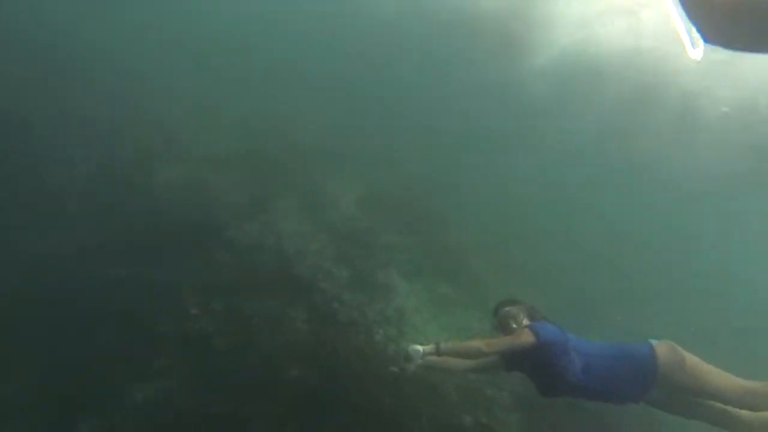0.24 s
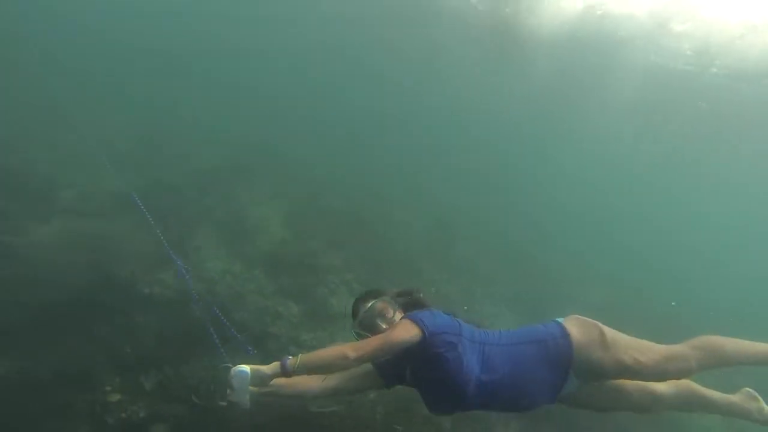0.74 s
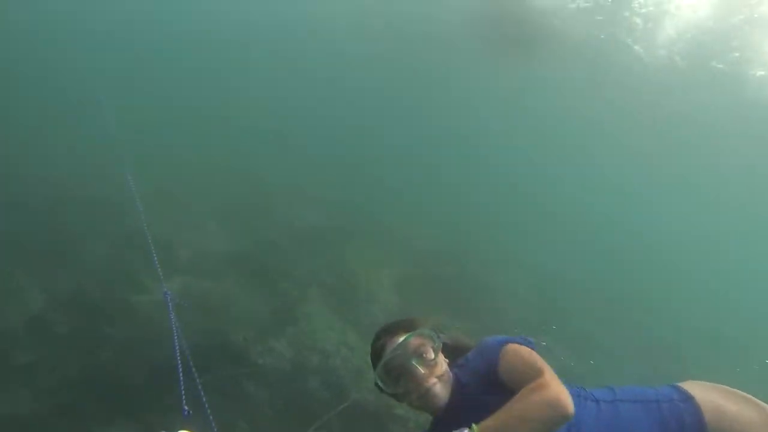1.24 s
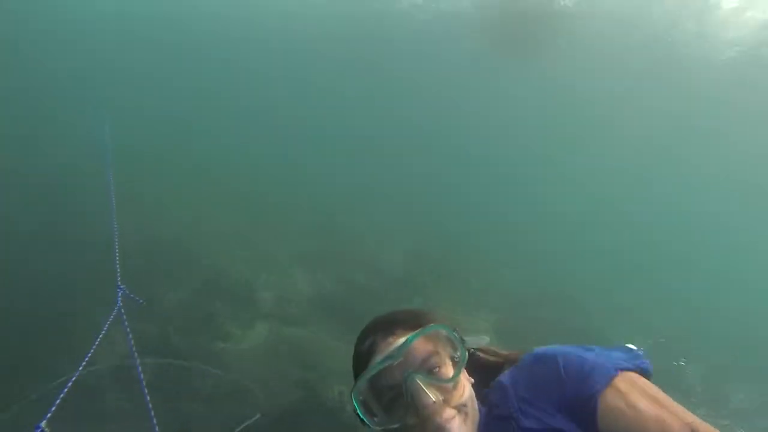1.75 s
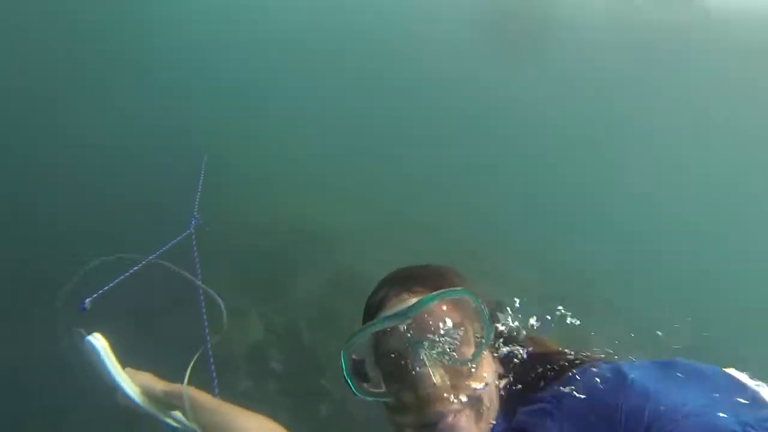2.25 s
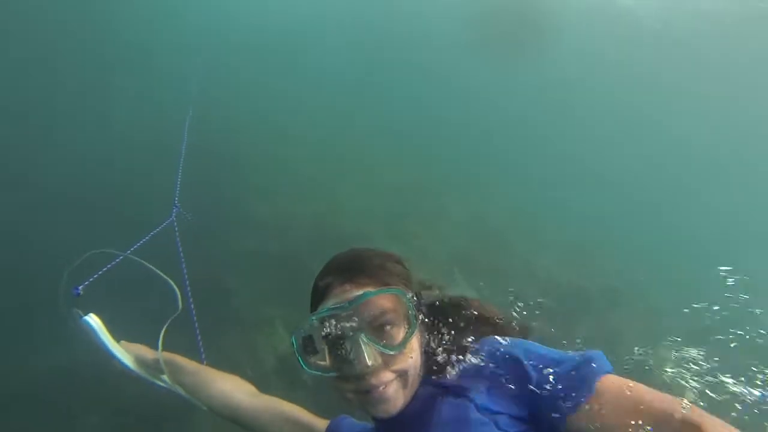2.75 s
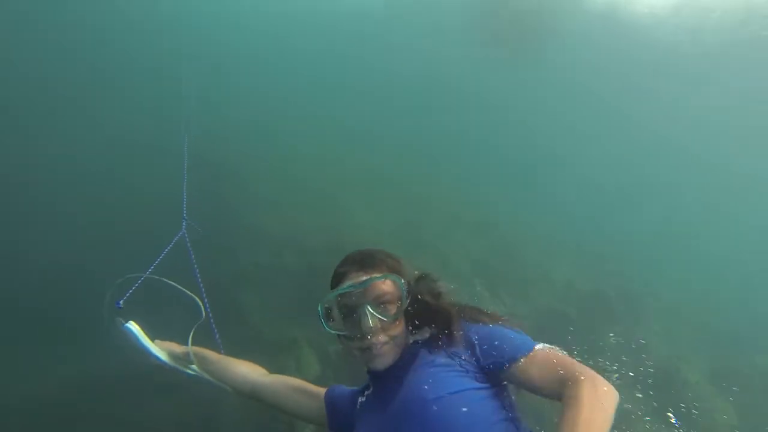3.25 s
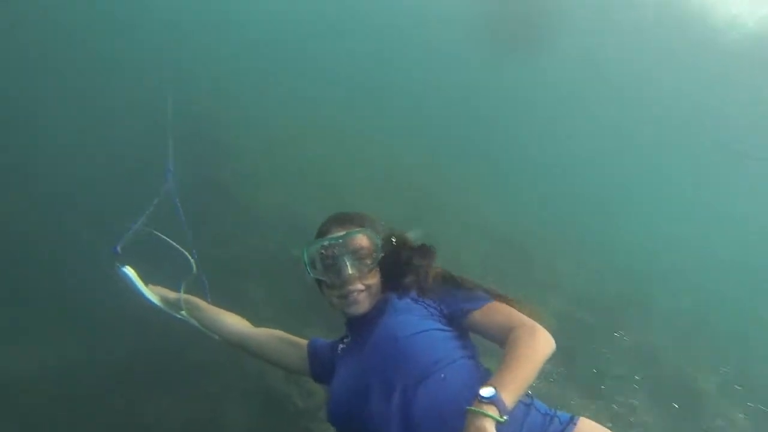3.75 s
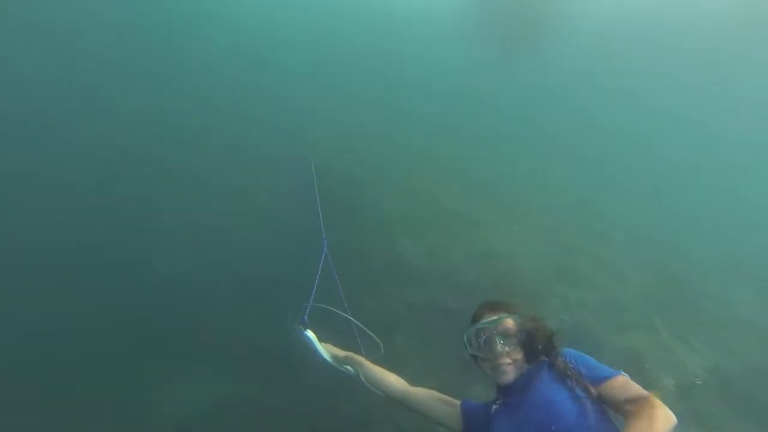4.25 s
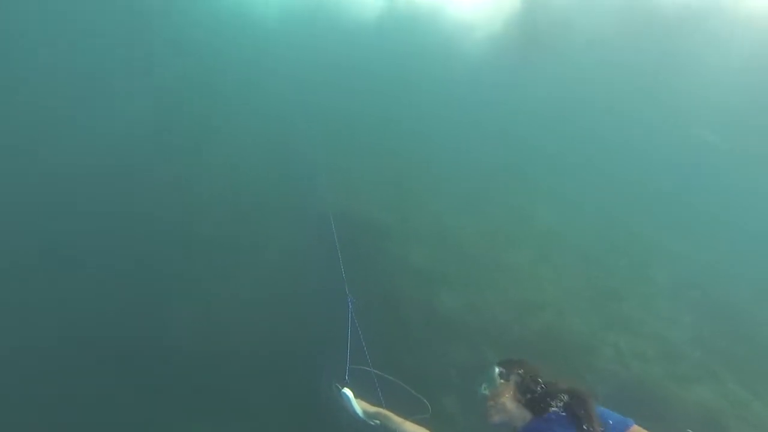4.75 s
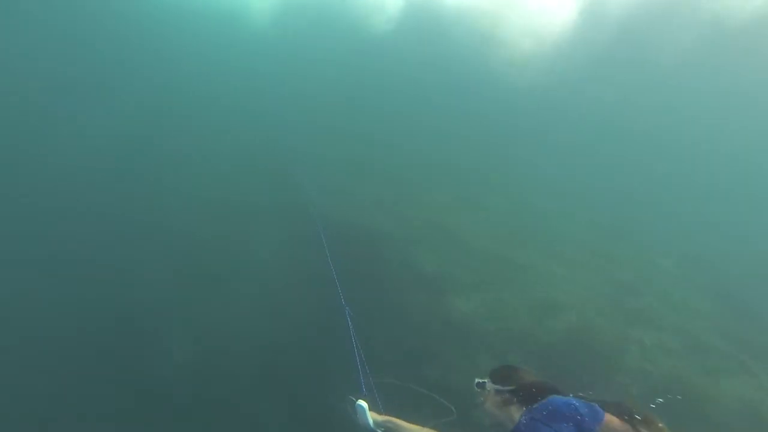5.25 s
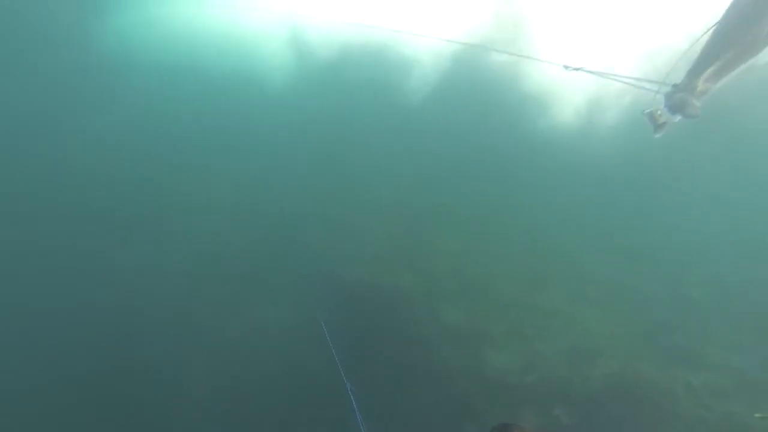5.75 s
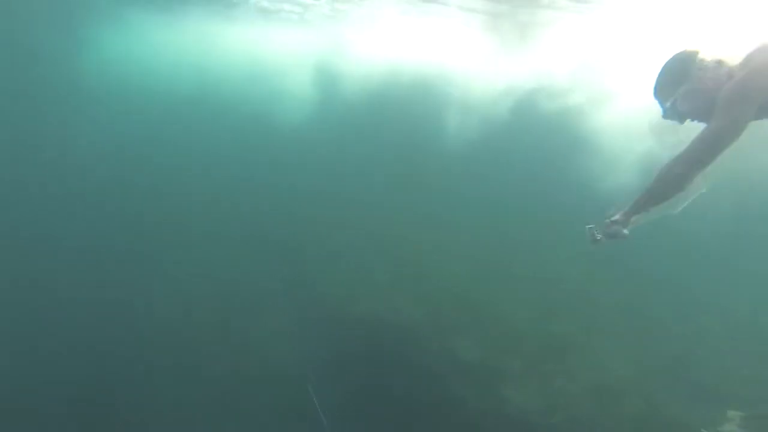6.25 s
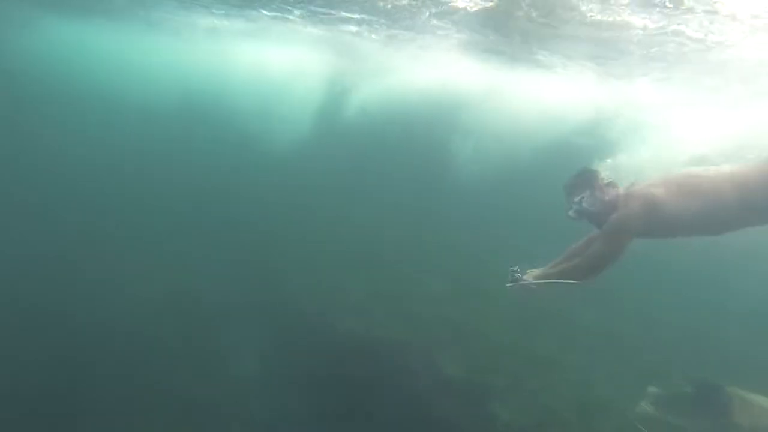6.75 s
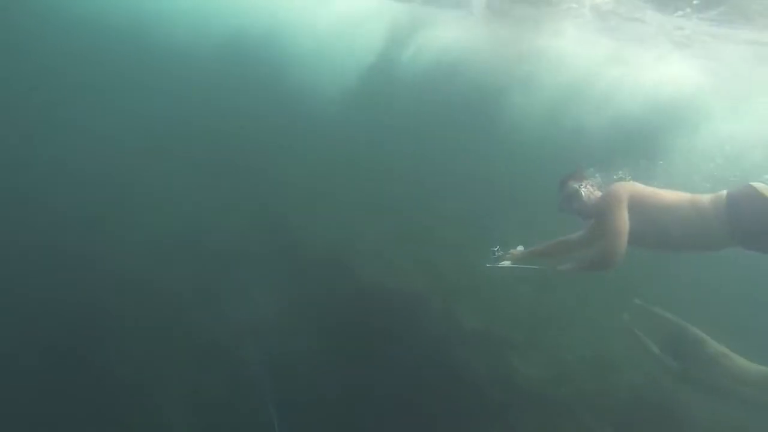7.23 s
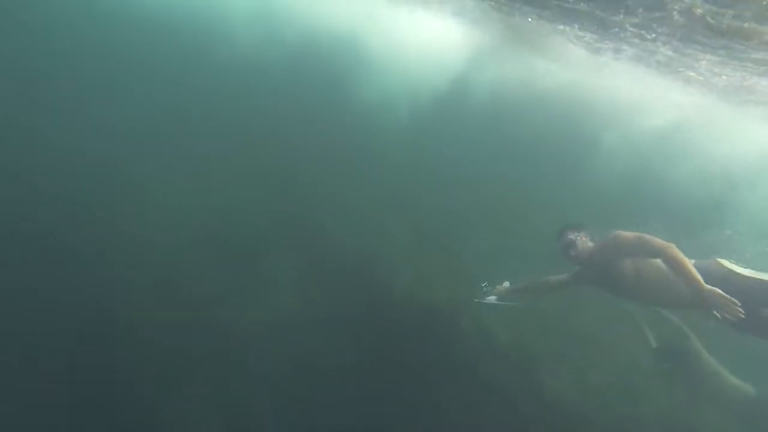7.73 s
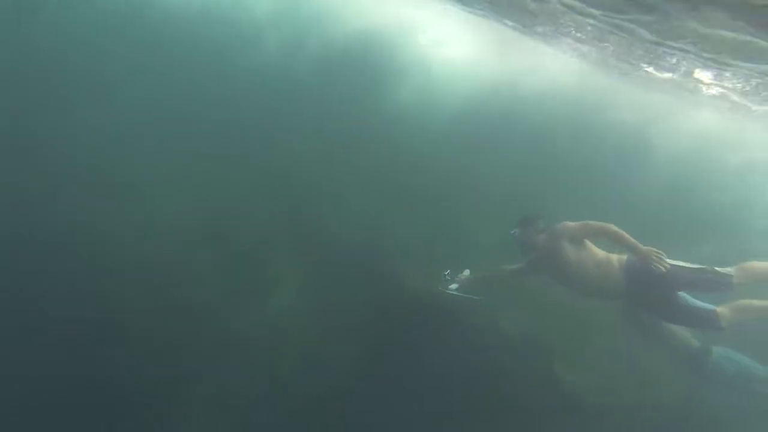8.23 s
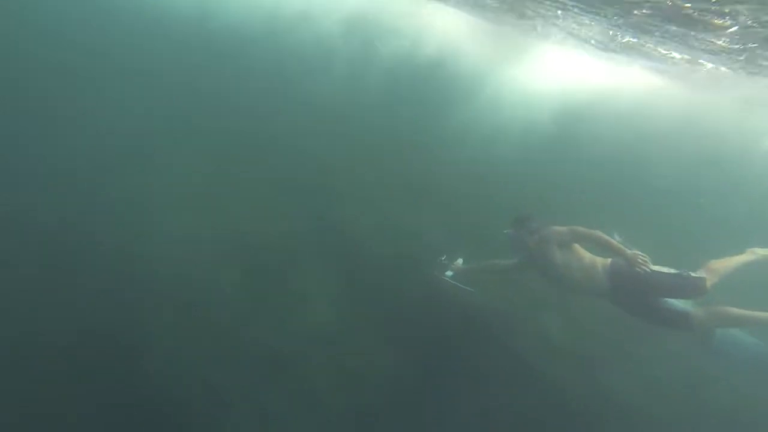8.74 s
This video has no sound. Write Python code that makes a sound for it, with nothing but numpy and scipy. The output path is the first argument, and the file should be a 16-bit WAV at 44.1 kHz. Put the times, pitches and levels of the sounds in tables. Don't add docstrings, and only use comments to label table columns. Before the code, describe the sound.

Close, muffled underwater sound from a microphone dragged through the sea. It opens with strong low rumble, eases before three seconds, then surges again, with heavy slaps near seven. A soft motor drone rises early, wobbles in pitch, and disappears about seven and a half seconds in. Fizzing wake, ringing bubbles, gurgles and sparse dry ticks continue over the rumble to the end.

```python
import sys
import numpy as np
from scipy import signal
from scipy.fft import rfft, irfft, next_fast_len
from scipy.io import wavfile
from scipy.ndimage import uniform_filter1d

SR = 44100
rng = np.random.default_rng(int(sys.argv[2]) if len(sys.argv) > 2 else 0)


def volts_from_db(level):
    exponent = np.asarray(level, float) / 20
    return 10 ** exponent


def dump_mix(stems):
    frames = np.atleast_2d(stems).T
    limited = np.clip(frames, -1, 1)
    pcm = np.round(limited * 32767).astype(np.int16)
    wavfile.write(sys.argv[1], SR, pcm)


N = 396459

# (time [s], level [dB])
FLOW = [(0.0, -17.5), (0.5, -19.5), (1.0, -18.5), (1.8, -21.5), (2.2, -23.5), (2.7, -26), (3.2, -24),
        (3.8, -20), (4.3, -20.5), (4.9, -22), (5.6, -22.5), (6.3, -22), (6.7, -19.5), (7.5, -17),
        (7.8, -22), (8.2, -22), (8.55, -21), (8.99, -24.5)]
# (frequency [Hz], density [dB per Hz])
DEEP_COLOUR = [(4, -37.5), (10, 7.5), (20, -2.5), (45, -1), (75, -7.5), (110, -18.5), (160, -39)]
# (frequency [Hz], density [dB per Hz])
UPPER_COLOUR = [(60, -17.5), (95, 0), (140, -5), (200, -13), (300, -22.5), (450, -30.5), (700, -58.5)]
# (time [s], peak [dB], pitch [Hz])
EDDIES = [(0.569, -13, 70), (1.061, -19, 24.74), (2.87, -10, 33.3), (3.19, -9, 36.1), (3.644, -13, 25.3),
          (3.9, -21, 84.1), (4.087, -11.5, 48.1), (5.192, -27.5, 55.6), (5.607, -15, 48),
          (5.965, -12.5, 39.9), (6.035, -11, 35), (6.331, -17.5, 30), (6.538, -13, 35), (7.031, -7.5, 32),
          (7.256, -20, 47.5), (7.479, -6.5, 32), (7.966, -15.5, 65.2), (8.48, -12, 35), (8.714, -22, 51.2)]
# (time [s], pitch [Hz], level [dB])
ENGINE = [(0.0, 115.1, -45), (0.19, 121.4, -30), (0.8, 125, -24), (1.1, 123.4, -26.5), (1.23, 119.7, -22.5),
          (1.95, 122.6, -23.5), (2.2, 116, -22.5), (2.61, 112.7, -29), (3.44, 118.8, -29),
          (3.8, 125.9, -23), (4.11, 125.6, -26.5), (5.09, 120.3, -28.5), (6.25, 121.8, -35.5),
          (6.67, 117.6, -34), (6.76, 108, -31), (7.1, 107, -27), (7.55, 113.2, -28)]
# (time [s], level [dB])
WAKE = [(0.0, -42.5), (0.9, -41.5), (1.4, -41), (1.75, -37.5), (2.0, -42.5), (2.3, -38.5), (2.75, -40),
        (3.3, -43), (3.9, -40), (4.5, -40), (4.8, -38), (5.8, -38.5), (6.25, -41), (6.9, -42), (7.1, -42),
        (7.45, -39), (7.7, -42.5), (8.99, -44)]
# (frequency [Hz], density [dB per Hz])
FIZZ_COLOUR = [(700, -33.5), (1000, -5), (1290, -5.5), (1490, -0.8), (1930, -4), (2220, -11.5),
               (2400, -12.5), (2820, -20), (3180, -16.5), (3500, -24.1), (4200, -81)]
# (frequency [Hz], density [dB per Hz])
GURGLE_COLOUR = [(300, -25.5), (450, -5.5), (600, -5), (800, -0.5), (1000, -3), (1200, -15), (1600, -20.5)]
# (frequency [Hz], density [dB per Hz])
HISS_COLOUR = [(2800, 6), (3600, 2.5), (4500, 2), (5200, -4), (5700, -5), (6600, -10), (8000, -9.5),
               (8900, -16), (9900, -9.5), (10600, -14.6), (12200, -17), (13500, -19.5), (14200, -25),
               (15000, -36), (16000, -52.5)]
# (start [s], end [s], centre [Hz], width [Hz], level [dB])
STREAMS = [(-0.43, 0.5, 1230, 230, -43), (4.5, 7, 1005, 84, -54.5), (7.5, 8.7, 873, 63, -55.5),
           (2.5, 4.2, 9940, 450, -79), (2.5, 3.2, 9890, 400, -76), (8.5, 9.9, 410, 280, -51),
           (6, 7.1, 790, 350, -51.5), (9.5, 9.9, 7300, 700, -78), (0, 4.96, 144.3, 31, -35.5),
           (4, 7.8, 111.8, 18, -35.5), (7.6, 8.3, 66.5, 19, -24), (4, 4.25, 75.2, 30, -27.5),
           (0, 2, 225, 120, -49), (7, 7.65, 220, 420, -43), (6.6, 7.05, 310, 360, -40),
           (6.7, 7.4, 480, 350, -51), (6.76, 7.06, 1560, 620, -38.5), (1.16, 1.48, 1440, 820, -38.5),
           (2, 2.379, 1380, 650, -39.5), (2.5, 2.75, 1580, 480, -40.5), (4.5, 4.7, 204, 190, -39)]
# (time [s], peak [dB], pitch [Hz])
BUBBLES = [(0.312, -33, 1300), (1.17, -23.5, 1610), (1.34, -17.5, 1814), (2.04, -22.5, 1475),
           (2.096, -19.5, 1750), (2.216, -20, 1340), (2.24, -15.5, 1437), (2.373, -22.5, 1257),
           (2.394, -14.5, 1783), (2.449, -13, 1417), (2.649, -21.5, 1680), (2.685, -20, 1890),
           (2.896, -28, 1600), (3.289, -17.5, 1640), (3.417, -26.5, 1530), (4.692, -21, 1470),
           (5.398, -21, 1310), (5.829, -21, 1580), (5.926, -22.5, 1650), (6.055, -22.5, 1430),
           (6.492, -23, 1010), (6.522, -15.5, 855), (6.673, -25, 955), (6.777, -22.5, 1380),
           (6.844, -18, 837), (6.901, -21, 1460), (7.022, -22, 940), (7.268, -23, 780), (8.559, -23.5, 835),
           (8.957, -27, 984),
           (0.067, -33.5, 4340), (0.411, -24, 1170), (0.732, -38, 2296), (1.298, -28, 1480),
            (2.177, -24, 1320), (7.345, -21, 1400), (7.958, -27.5, 1700), (1.8776, -31, 2340),
            (2.0412, -30, 2500), (2.0988, -28, 3046), (2.5117, -30, 2245), (4.6696, -34, 2540),
            (4.6934, -31, 2364), (4.7976, -31.5, 2504), (5.0953, -33.5, 2360), (5.3162, -32, 3185),
            (5.827, -39, 2380), (6.5137, -31, 2610), (6.563, -25.5, 2044), (6.778, -29, 2170),
            (6.858, -21.5, 1740), (6.9034, -29, 2290), (7.0206, -32, 2590), (7.2694, -25, 2290),
            (7.4116, -36, 2560),
           (0.212, -22.5, 1148), (1.084, -32, 640), (1.317, -22.5, 1780), (1.379, -21, 1515),
          (1.673, -28.5, 980), (1.741, -27, 1412), (2.135, -27, 1550), (2.208, -22, 1450),
          (2.559, -28.5, 1475), (2.632, -27, 1596), (2.662, -20, 1738), (2.738, -26.5, 1880),
          (2.791, -25.5, 1710), (3.068, -28, 1487), (4.628, -27.5, 1560), (4.652, -27.5, 1480),
          (5.096, -26, 1830), (5.248, -24, 1670), (5.59, -26, 1788), (5.802, -27, 1487),
          (6.145, -28.5, 1807), (6.25, -29.5, 1056), (6.707, -27, 1610), (7.152, -26.5, 1384),
          (7.378, -25.5, 1466), (7.737, -28.5, 1913), (7.778, -28.5, 853), (7.988, -29.5, 1142),
          (8.098, -29, 907), (8.259, -33, 1545), (8.609, -27, 1383), (8.893, -29, 1812)]
# (time [s], peak [dB], pitch [Hz], t60 [s])
KNOCKS = [(2.393, -24.5, 263, 0.11), (3.28, -36, 279, 0.066), (3.801, -14.5, 129.8, 0.17),
          (4.59, -18, 177.5, .1), (4.63, -20, 188, 0.09), (6.72, -26, 192, 0.075),
          (7.198, -21.5, 171, 0.13), (6.978, -26, 773, 0.046), (6.524, -30, 622, 0.083),
          (7.545, -15.5, 438, 0.025), (8.528, -16.5, 221, 0.04)]
# (time [s], body [dB], middle [dB], edge [dB])
SNAPS = [(0.0662, -41, -66.0, -72.0), (0.1456, -43.0, -52, -64.0), (0.161, -45, -53.0, -62.0),
         (0.173, -39, -51.0, -49.0), (0.2932, -33, -41, -47.0), (0.5541, -51.0, -58.0, -62.0),
         (0.5657, -40, -51, -66.0), (0.5945, -39.0, -51.0, -54.0), (0.6165, -35, -62.0, -63.0),
         (0.6368, -40.0, -53.0, -64.0), (0.655, -53.0, -66.0, -69.0), (0.7317, -32, -49, -61.0),
         (1.1976, -50.0, -65.0, -65.0), (1.272, -45, -52.0, -65.0), (1.3186, -50.0, -63.0, -57.0),
         (1.351, -38, -39, -43.0), (1.5963, -48.0, -51, -68), (1.7669, -41.0, -52, -69),
         (1.7937, -36, -46, -58), (1.8121, -43, -55.0, -56.0), (1.878, -37.5, -64.0, -67.0),
         (2.063, -47.0, -55, -71.0), (2.0887, -39, -50.0, -62.0), (2.2358, -50.0, -60.0, -73.0),
         (2.4418, -47, -64.0, -66.0), (3.0782, -47.0, -60.0, -63.0), (3.278, -45.0, -53.0, -67.0),
         (3.3293, -43.0, -57.5, -66.0), (3.4138, -42, -47.0, -49.0), (3.462, -43.0, -52.0, -51.0),
         (3.4925, -43.0, -52.0, -56.0), (3.6012, -44.0, -52.0, -50.0), (3.69, -48.0, -53, -62.0),
         (3.8442, -46.0, -55.0, -62.0), (4.5321, -37, -52.0, -48), (4.597, -46.0, -54, -61.0),
         (4.6982, -40.0, -43, -46), (4.7426, -39, -53.0, -62.0), (4.8773, -39, -52.0, -49.0),
         (4.9357, -49.0, -52.0, -57.0), (5.0314, -45.0, -68.0, -65.0), (5.2525, -42.0, -58.0, -64.0),
         (5.3148, -36, -52.0, -51.0), (5.3453, -45.0, -55.0, -64.0),
         (5.489, -56.0, -51, -57.0), (5.6291, -40, -44, -58.0), (5.685, -47, -47, -52.0),
              (5.7808, -42, -61.0, -64.0), (5.8651, -50.0, -50.0, -55.0), (5.9933, -39, -46, -46),
              (6.3325, -41.0, -57.0, -68.0), (6.3834, -47.0, -48, -50.0), (6.4437, -45.0, -56.0, -71.0),
              (6.4867, -48.0, -51, -71.0), (6.6508, -37, -46, -58.0), (6.9441, -43, -62.0, -65.0),
              (6.991, -56.0, -48, -61.0), (7.1821, -40, -56.0, -66.0), (7.3123, -44, -47, -57.0),
              (7.3567, -50.0, -56.0, -55.0), (7.4151, -44, -50.0, -57.0), (7.5183, -45, -49, -69.0),
              (7.6151, -44.0, -50.0, -59.0), (7.7248, -49.0, -47.0, -53.0), (8.0701, -43, -46, -53.0),
              (8.4118, -58.0, -45.0, -65.0), (8.4327, -46.0, -55.0, -52.0), (8.5334, -48.0, -53.0, -65.0),
              (8.5764, -44.0, -61.0, -67.0), (8.5959, -49.0, -43.0, -39), (8.6807, -37, -43, -54),
              (8.7685, -43.0, -64.0, -63.0), (8.807, -48.0, -52.0, -67.0), (8.883, -56.0, -55, -68.0),
              (8.9047, -44, -55, -66.0), (8.928, -58.0, -56.0, -69.0), (8.962, -59.0, -56.0, -53)]
# (frequency [Hz], level [dB])
WHINE = [(9890, -95), (11149, -92), (11209, -99)]

MEAN_FLOW_DB, MEAN_WAKE_DB = -20, -41


def evened(x):
    return x / np.sqrt(np.mean(x ** 2) + 1e-20)


def curves(rows):
    s, *columns = np.transpose(rows)
    return [np.interp(np.arange(N) / SR, s, c) for c in columns]


def coloured(x, points):
    f, db = np.transpose(points)
    size = next_fast_len(N)
    hz = np.fft.rfftfreq(size, 1 / SR)
    gain = volts_from_db(np.interp(np.log(hz + 1), np.log(f), db, -120, -120))
    return evened(irfft(rfft(x, size) * gain, size)[:N])


def drift(hz):
    coarse = rfft(rng.standard_normal(2048))
    coarse /= 1 + (np.arange(len(coarse)) * SR / N / hz) ** 2
    return np.interp(np.linspace(0, 2047, N), np.arange(2048), evened(irfft(coarse)))


def add(mix, s, sound):
    part = mix[round(s * SR):][:len(sound)]
    part += sound[:len(part)]


def ping(hz, t60, glide, rise_s):
    t = np.arange(round(t60 * SR) + 8) / SR
    tone = np.sin(2 * np.pi * hz * t * (1 + glide * t / t60))
    return tone * volts_from_db(-60 * t / t60) * (1 - np.exp(-t / rise_s))


def flow():
    flow_db, = curves(FLOW)
    deep = coloured(rng.standard_normal(N), DEEP_COLOUR)
    lumpy_noise = rng.standard_normal(N) * volts_from_db(2.36 * drift(50))
    upper = coloured(lumpy_noise, UPPER_COLOUR)
    deep_db = flow_db + 1.36 + 2 * drift(8.4)
    upper_db = -31 + 1.21 * (flow_db - MEAN_FLOW_DB)
    push = volts_from_db(deep_db) * deep + volts_from_db(upper_db) * upper
    return 0.5 * np.tanh(push / 0.5)


def eddies():
    out = np.zeros(N)
    for s, db, hz in EDDIES:
        add(out, s, volts_from_db(db + 5) * ping(hz, t60=4 / hz, glide=-0.05, rise_s=0.37 / hz))
    return out


def engine():
    hz, db = curves(ENGINE)
    phase = 2 * np.pi * np.cumsum(hz * (1 + 0.014 * drift(8))) / SR
    fade = np.clip((ENGINE[-1][0] - np.arange(N) / SR) / 0.21, 0, 1)
    level = np.sqrt(2) * fade * volts_from_db(db - 1 + 1.65 * drift(10.7))
    return level * (np.sin(phase) + volts_from_db(-25) * np.sin(2 * phase))


def swarm(lo_hz, hi_hz, per_s, cycles, spread_db, clump_db):
    kinds = 20
    hits = volts_from_db(spread_db * np.minimum(rng.exponential(1, N), 4)) * rng.choice([-1, 1], N)
    hits *= rng.random(N) < per_s / SR * volts_from_db(clump_db * drift(12))
    kind, out = rng.integers(0, kinds, N), np.zeros(N)
    for k, hz in enumerate(np.geomspace(lo_hz, hi_hz, kinds)):
        decay = np.exp(-np.log(1000) * hz / cycles / SR)
        turn = 2 * np.pi * hz / SR
        resonance = [1, -2 * decay * np.cos(turn), decay ** 2]
        out += signal.lfilter([np.sin(turn) * hz], resonance, hits * (kind == k))
    return evened(out)


def patchy(x, depth_db):
    z = signal.stft(x, nperseg=512)[2]
    across_hz = uniform_filter1d(rng.standard_normal(z.shape), 5, 0)
    patches = evened(uniform_filter1d(across_hz, 20, 1))
    return signal.istft(z * volts_from_db(depth_db * patches), nperseg=512)[1][:N]


def wake():
    fizz_db, = curves(WAKE)
    flow_db, = curves(FLOW)
    nearness_db = fizz_db - MEAN_WAKE_DB
    gurgle_db = -48.5 + 0.83 * nearness_db + 0.49 * (flow_db - MEAN_FLOW_DB)
    hiss_db = -58.5 + 0.48 * nearness_db
    foam = rng.standard_normal((3, N))
    small = swarm(900, 4220, per_s=2000, cycles=30, spread_db=2.6, clump_db=1.7)
    fizz = coloured(0.94 * foam[0] + 0.59 * small, FIZZ_COLOUR)
    large = swarm(400, 1290, per_s=400, cycles=22, spread_db=3.3, clump_db=2.3)
    low_foam = coloured(foam[1], [(200, 0.0047), (2000, 0)])
    gurgle = coloured(0.87 * low_foam + 0.39 * large, GURGLE_COLOUR)
    crackle = swarm(3500, 15000, per_s=1000, cycles=20, spread_db=4.5, clump_db=2.5)
    hiss = coloured(1.03 * foam[2] + 0.6 * crackle, HISS_COLOUR)
    mix = volts_from_db(fizz_db + 0.3) * fizz + volts_from_db(gurgle_db) * gurgle + volts_from_db(hiss_db) * hiss
    return patchy(mix * volts_from_db(1.1 * drift(30)), depth_db=0.49)


def streams():
    out = np.zeros(N)
    for start, end, hz, width_hz, db in STREAMS:
        noise = rng.standard_normal(round((end - start) * SR))
        grains = noise * volts_from_db(2.5 * drift(60)[:len(noise)])
        edges_hz = [hz - width_hz / 2, hz + width_hz / 2]
        band = signal.butter(2, edges_hz, "band", fs=SR, output="sos")
        swell = signal.windows.tukey(len(noise), 0.6)
        add(out, max(start, 0), volts_from_db(db) * evened(signal.sosfilt(band, grains)) * swell)
    return out * volts_from_db(1.4 * drift(28))


def pops():
    out, near = np.zeros(N), BUBBLES
    chances = rng.uniform(-1, 1, (len(near), 2))
    for (s, db, hz), (detune, lag) in zip(near, chances):
        t60 = 0.04 * (1000 / hz) ** 0.52
        add(out, s, volts_from_db(db - 4) * ping(hz, t60, glide=0.052, rise_s=0.0001))
        neighbour = ping(hz * (1 + 0.07 * detune), t60, glide=0.17, rise_s=0.00057)
        add(out, s + 0.0065 + 0.005 * lag, volts_from_db(db - 9) * neighbour)
    return out


def knocks():
    out = np.zeros(N)
    for s, db, hz, t60 in KNOCKS:
        add(out, s, volts_from_db(db + 4) * ping(hz, t60, glide=0.014, rise_s=0.0053))
    return out


def far_snaps():
    when, loud, body, middle, edge = rng.uniform(-0.87, 1, (40, 5)).T
    s = (when + 1) / 2 * N / SR
    db = -52 + 4 * loud
    return np.c_[s, db + 5 * body, db - 5 + 4 * middle, db - 11 + 6 * edge]


def snaps():
    out, t = np.zeros(N), np.arange(400) / SR
    rows = np.vstack([SNAPS, far_snaps()])
    crack = rng.standard_normal((len(rows), len(t))) * volts_from_db(-60 * t / 0.013)
    bands = []
    for edges_hz in ([2600, 5070], [5200, 9000], [9000, 14000]):
        band = signal.butter(3, edges_hz, "band", fs=SR, output="sos")
        bands.append(signal.sosfilt(band, crack))
    bands = np.array(bands)
    bands /= abs(bands).max(axis=2, keepdims=True)
    for k, (s, *parts_db) in enumerate(rows):
        add(out, s, volts_from_db(np.add(parts_db, [0, 1, -1.5])) @ bands[:, k])
    return out


def whine():
    t, out = np.arange(N) / SR, np.zeros(N)
    for hz, db in WHINE:
        out += np.sqrt(2) * volts_from_db(db) * np.sin(2 * np.pi * (hz * t + 0.15 * drift(3)))
    return out


def scene():
    water = flow() + eddies() + wake() + streams() + pops()
    return (water + engine() + knocks() + snaps() + whine())[None]


def dropouts(x):
    share, lo_hz, hi_hz, cut_db = 0.3, 11500, 14900, -24
    hz, _, z = signal.stft(x, SR, nperseg=512)
    frames = z.shape[-1]
    chances = rng.random((frames // 4 + 1, 2))
    hit, depth = np.repeat(chances, 4, axis=0)[:frames].T
    edge_hz = np.where(hit < share, hi_hz - (hi_hz - lo_hz) * depth ** 2, SR)
    gain = np.where(hz[:, None] > edge_hz, volts_from_db(cut_db), 1)
    return signal.istft(z * gain, SR, nperseg=512)[1][:, :N]


def top_cut(x):
    return signal.sosfilt(signal.butter(12, 15100, fs=SR, output="sos"), x)


def record(dry):
    finished = dropouts(dry)
    return top_cut(finished)


dry = scene()
out = record(dry)
dump_mix(out)
```